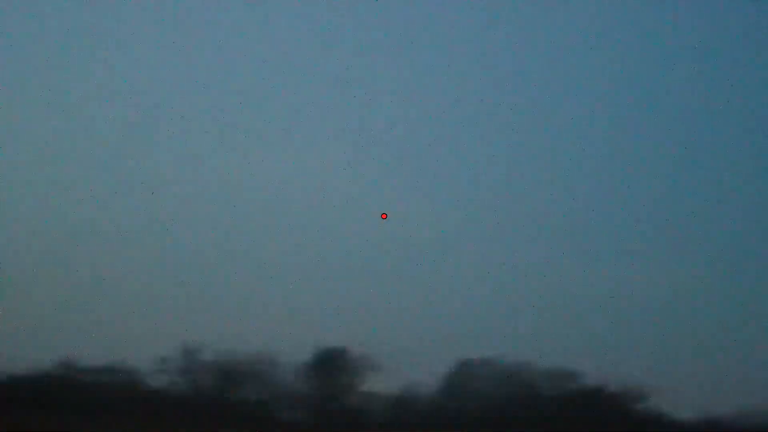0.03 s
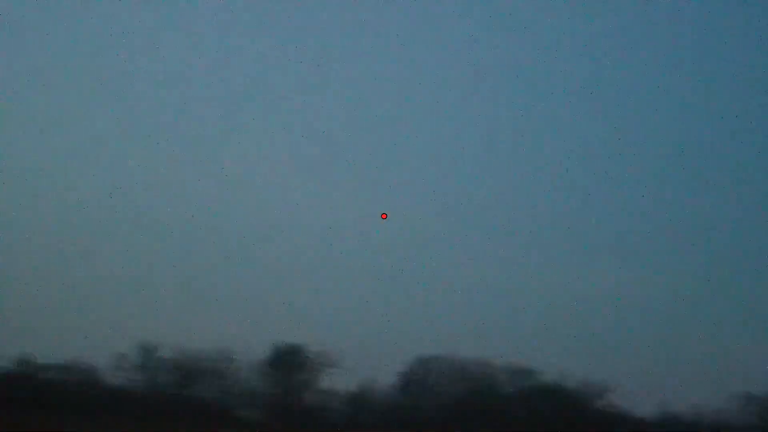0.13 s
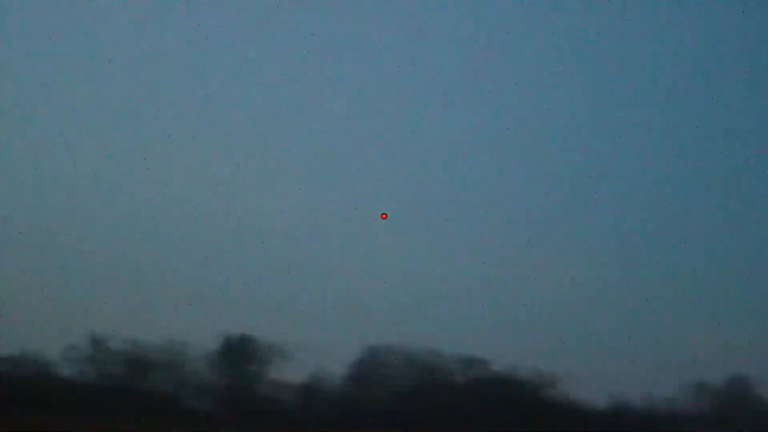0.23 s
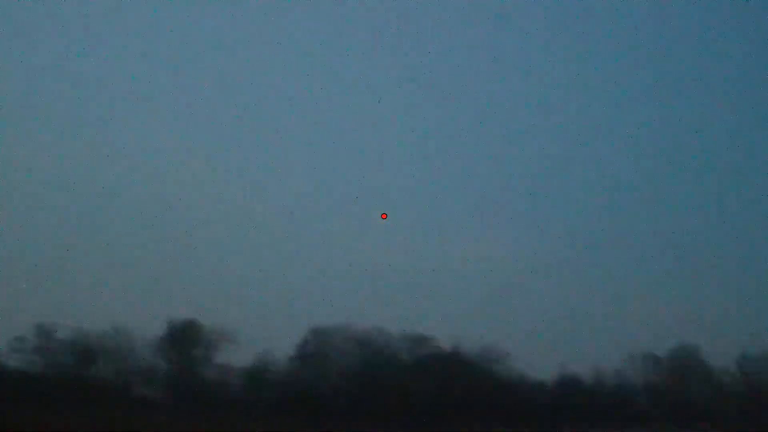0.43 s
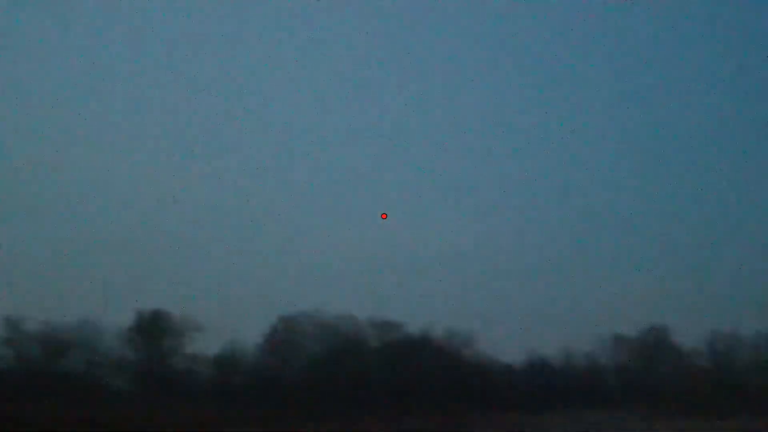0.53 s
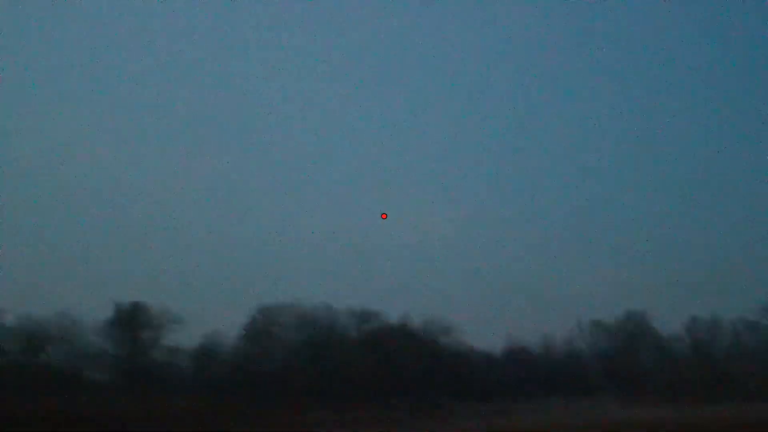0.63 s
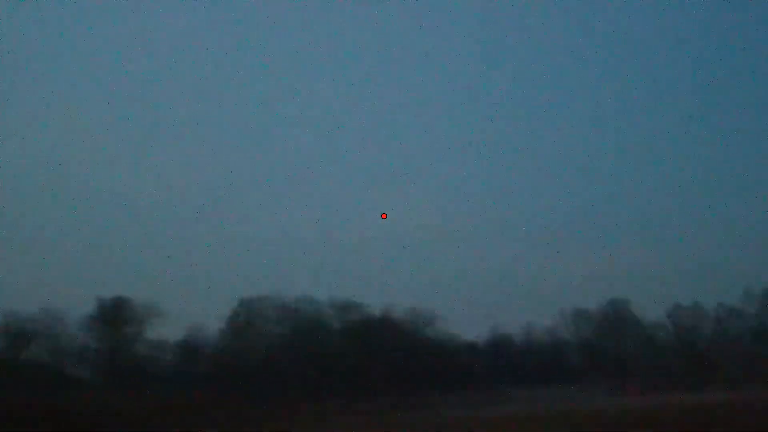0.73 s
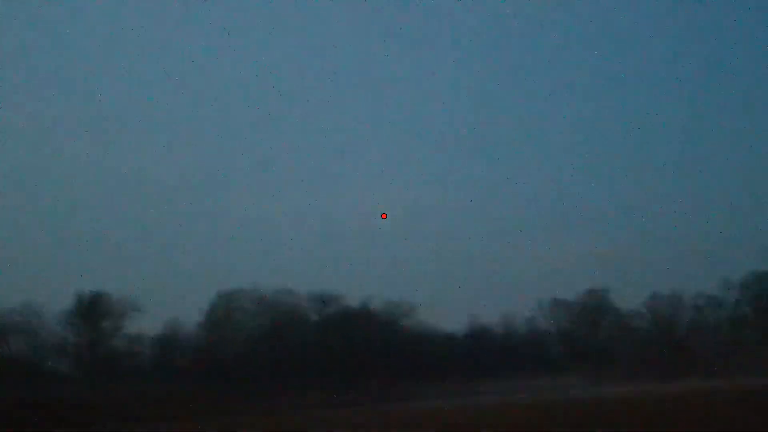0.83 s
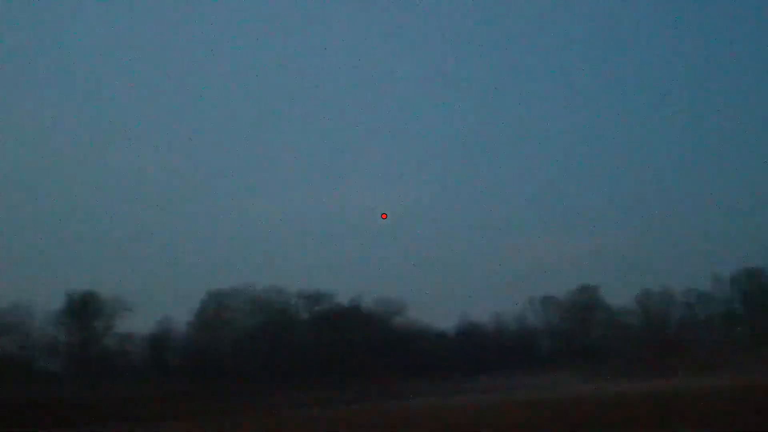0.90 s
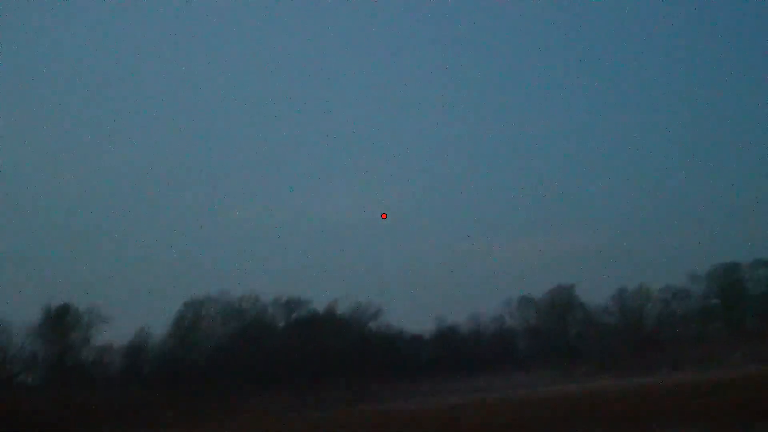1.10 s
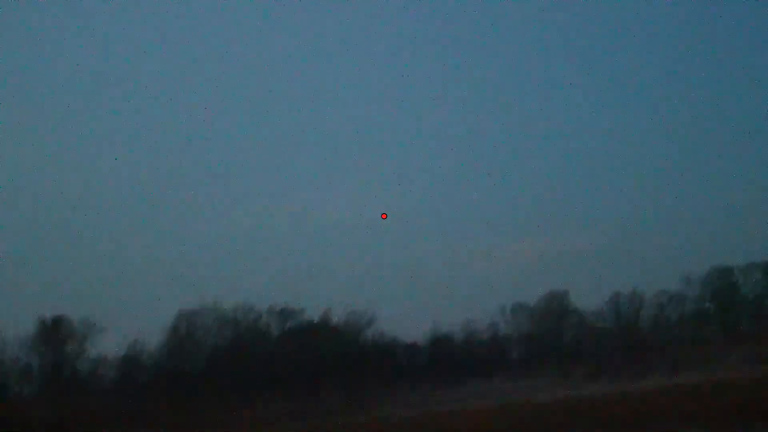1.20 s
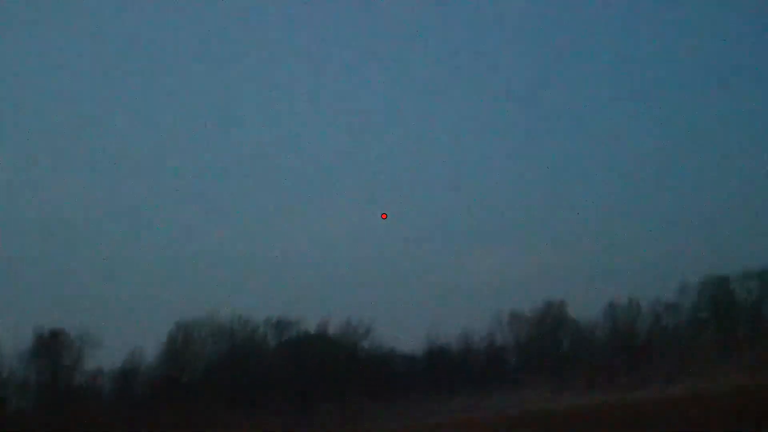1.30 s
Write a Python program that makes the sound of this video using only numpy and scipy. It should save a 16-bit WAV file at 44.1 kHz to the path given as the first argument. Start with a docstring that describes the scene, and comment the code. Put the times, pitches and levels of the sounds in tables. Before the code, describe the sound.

One very close gunshot heard through a small camera housing, preceded by a short clack of the gun's action; the distorted bang breaks into quick echoes and a boxy, humming rumble fading into faint wind and hiss.

```python
"""Open country, with one gunshot heard on a small camera that probably rides on the gun.
A clack of the action (decaying sines and a noise tick) rings the housing, over faint hiss and wind.
The blast, a pressure swing with a noisy crack, overloads the microphone for about 20 ms.
Tree lines send back sharp slaps of noise, low booms and a long rolling echo of ever duller noise;
the housing colours the echo and hums along as a wavering low tone."""
import sys
import numpy as np
from scipy import signal
from scipy.fft import irfft
from scipy.io import wavfile

SR = 44100
rng = np.random.default_rng(int(sys.argv[2]) if len(sys.argv) > 2 else 0)


def transcribe(u):
    """Save the signal u as a 16-bit wav file named by the first command-line argument.

    u: samples, shape (n,) or (channels, n), limited to [-1, 1]; the rate is SR.
    q: integer samples, one column per channel.
    """
    v = np.clip(np.atleast_2d(u).T, -1, 1)
    q = np.round(v * 32767).astype(np.int16)
    wavfile.write(sys.argv[1], SR, q)


N = 59535

SHOT_S = 0.2285


def undb(db):
    """Decibels to gain."""
    return 10 ** (np.asarray(db) / 20)


def unit(x):
    """Scale to rms 1."""
    return x / np.sqrt(np.mean(x ** 2))


def since(start_s):
    """Seconds since a moment, zero before it."""
    return np.maximum(np.arange(N) / SR - start_s, 0)


def burst(start_s, rise_s, decay_s):
    """A quick rise and an exponential fall."""
    age = since(start_s)
    rise = 1 - np.exp(-(age / rise_s) ** 2)
    return rise * np.exp(-age / decay_s)


def bump(at_s, width_s):
    """One rounded push of pressure, falling to 1/e at width_s either side."""
    return np.exp(-((np.arange(N) / SR - at_s) / width_s) ** 2)


def curve(points):
    """Gain over time from (s, dB) points, opening with the shot."""
    time_s, level_db = np.array(points).T
    gain = undb(np.interp(np.arange(N) / SR, time_s, level_db))
    return gain * np.minimum(since(SHOT_S) / 0.0019, 1)


def noise(points):
    """Noise of rms 1 with random phases and a spectrum drawn through (Hz, dB) points."""
    octave = np.log2(np.maximum(np.arange(N // 2 + 1) * SR / N, 1))
    hz, db = np.array(points).T
    gain = undb(np.interp(octave, np.log2(hz), db))
    phase = 2 * np.pi * rng.random(len(gain))
    return unit(irfft(gain * np.exp(1j * phase), N))


def band(x, lo_hz, hi_hz):
    """Gentle band-pass."""
    sos = signal.butter(2, [lo_hz, min(hi_hz, SR / 2 - 1)], "band", fs=SR, output="sos")
    return signal.sosfilt(sos, x)


def background():
    """Faint hollow hiss and a little wind on the microphone: shaped noise and very low noise."""
    # spectrum of the steady hiss: pitch_hz, relative level_db (per Hz)
    hiss_spectrum = [(8, -2.5), (20, -8.5), (50, -13.5), (200, -11), (290, -26), (420, -23), (560, -17.5),
                     (680, -13), (820, -30.5), (1700, -41), (7000, -36.5)]
    hiss_db, wind_db = -47.5, -48.5
    hiss = undb(hiss_db) * noise(hiss_spectrum)
    wind = undb(wind_db) * unit(band(rng.standard_normal(N), 4.5, 25))
    return hiss + wind


def clack():
    """A tick of metal and the short modal ring of gun and housing, just before the shot."""
    # ringing modes of gun and housing: pitch_hz, relative level_db, t60_s (time to fall 60 dB)
    modes = [(197, -17, .11), (537.3, 0.5, 0.04), (592.6, -2, 0.044), (1036, -5.5, 0.014),
             (1285, -14, 0.02), (1585, -26.5, .032), (2075, -45, 0.083), (2300, -37.5, 0.036)]
    # spectrum of the metal tick: pitch_hz, relative level_db (per Hz)
    tick_spectrum = [(300, -37), (520, -9.5), (850, -5.5), (1200, 8.5), (1450, -9.5), (2000, -17.5),
                     (2600, -26), (3100, -12.5), (3700, -37), (7000, -41)]
    clack_s, rise_cycles = 0.135, 2.56
    ring_db, tick_db = -3, -24
    ring = 0
    for hz, db, t60_s in modes:
        envelope = burst(clack_s, rise_cycles / hz, t60_s / np.log(1000))
        ring = ring + undb(db) * envelope * np.sin(2 * np.pi * hz * since(clack_s))
    tick = noise(tick_spectrum) * burst(clack_s, 0.0012, 0.0058)
    return undb(ring_db) * ring + undb(tick_db) * tick


def blast():
    """A noisy crack on a huge, brief pressure swing that ends in a deep trough and settles."""
    # spectrum of the crack: pitch_hz, relative level_db (per Hz)
    crack_spectrum = [(100, -6.5), (200, 2.5), (330, -22.5), (600, -1.5), (820, -7.5), (1200, 1),
                      (2200, -11.5), (4000, -23.5), (7000, -22.5)]
    rise_s = 0.0015
    swing_hz, swing_db, swing_hold_s, swing_decay_s = 112, 8, 0.01232, 0.003
    suction_bias = 0.18
    trough_s, trough_width_s, trough_db = 0.2455, 0.0018, 20
    age = since(SHOT_S)
    opening = np.minimum(age / rise_s, 1)
    fading = np.exp(-since(SHOT_S + swing_hold_s) / swing_decay_s)
    swing = np.sin(2 * np.pi * swing_hz * age) - suction_bias
    swing = undb(swing_db) * opening * fading * swing
    # low pressure behind the front, then the slow return to rest
    trough = undb(trough_db) * bump(trough_s, trough_width_s)
    recovery = burst(trough_s, 0.002, 0.0098)
    crack = noise(crack_spectrum) * burst(SHOT_S, rise_s, 0.0092)
    return swing - trough + recovery + crack


def roll():
    """Scatter from ground and trees, ever duller, over a rumble that lasts longer."""
    # spectrum of the echoes as the housing passes them: pitch_hz, relative level_db (per Hz)
    echo_spectrum = [(100, -30), (240, -0.5), (305, -18.5), (370, -3.5), (470, 0), (660, -2), (820, -14.5),
                     (1080, -24), (1280, -14), (1470, -36), (2000, -28), (2400, -46.5), (2950, -31),
                     (3450, -43.5), (3850, -32.5), (4300, -48), (6200, -36), (6900, -37)]
    # spectrum of the rumble: pitch_hz, relative level_db (per Hz)
    rumble_spectrum = [(8, -32.5), (25, -7), (70, 10.5), (120, -8), (170, -2.5), (300, -6.5), (800, -62)]
    # strength of the rolling echo: time_s, level_db
    strength = [(0.237, -5), (0.261, -16), (0.296, -18), (0.324, -22.5), (.355, -21), (.41, -29.5),
                (.47, -30.5), (.53, -32), (.575, -36.5), (.635, -34.5), (.69, -39.5), (.83, -43),
                (.89, -40), (.98, -47.5), (1.09, -43), (1.16, -51.5), (1.35, -54.5)]
    air_db_per_s_khz = 6  # longer paths lose more treble
    rumble_db, rumble_db_per_s = -12.5, 7  # on top of the strength curve
    hz, s, cells = signal.stft(noise(echo_spectrum), SR, nperseg=1024)
    loss_db = air_db_per_s_khz * np.outer(hz / 1000, np.maximum(s - SHOT_S, 0))
    scatter = signal.istft(cells * undb(-loss_db), SR)[1][:N]
    rumble = noise(rumble_spectrum) * undb(rumble_db + rumble_db_per_s * since(SHOT_S))
    return curve(strength) * (scatter + rumble)


def hum():
    """The echoes keep the lowest mode of the housing ringing: a sine with a wavering pitch."""
    # level of the housing's hum: time_s, level_db (rms)
    strength = [(.24, 1), (.273, -22.5), (.297, -12), (.328, -40), (.363, -19), (.40, -22.5), (.47, -33),
                (.52, -32.5), (.553, -46.5), (.59, -30.5), (.665, -37), (.735, -52), (.77, -34.5),
                (.83, -46), (.9, -38.5), (1, -51), (1.035, -42.5), (1.135, -62), (1.175, -51), (1.35, -58)]
    housing_hz, wander_rms_hz = 199, 13.2
    wander = unit(band(rng.standard_normal(N), 4.5, 40))
    phase = 2 * np.pi * np.cumsum(housing_hz + wander_rms_hz * wander) / SR
    return curve(strength) * np.sqrt(2) * np.sin(phase)


def slaps():
    """Short, brighter returns of the crack from single trees and edges: bursts of noise."""
    # sharp echoes: start_s, level_db
    returns = [(0.261, -13.5), (0.287, -13.5), (0.338, -19), (0.355, -18.5), (0.459, -30), (0.48, -22.5),
               (0.502, -29.5), (0.523, -27.5), (.534, -42), (0.552, -30.5), (0.607, -36), (0.86, -38.5),
               (0.892, -37), (0.923, -34), (1.028, -38)]
    # spectrum of the sharp echoes: pitch_hz, relative level_db (per Hz)
    slap_spectrum = [(150, -13.5), (300, -18), (450, 8.5), (680, 7), (850, -16.5), (1280, -3.5),
                     (1500, -28), (2100, -23), (2500, -40.5), (3900, -36), (7000, -50)]
    envelope = sum(undb(db) * burst(s, 0.0004, 0.0062) for s, db in returns)
    return noise(slap_spectrum) * envelope


def booms():
    """Rounded returns of the pressure wave from the tree lines: band-passed dips of pressure."""
    # low echoes: peak_s, peak level_db ahead of the band-pass
    returns = [(0.288, -11), (0.368, -10.5), (.392, -25.5), (0.414, -11.5), (0.451, -20), (0.583, -22),
               (0.657, -30), (.770, -33.5), (0.799, -34.5), (0.82, -29), (1.037, -35.5), (1.094, -35)]
    pressure = -sum(undb(db) * bump(s, 0.0019) for s, db in returns)
    return band(pressure, 26, 900)


def scene():
    """Clack, shot and echoes over the quiet field."""
    shot = blast() + roll() + hum() + slaps() + booms()
    return (background() + clack() + shot)[None]


def record(dry):
    """The input saturates with rounded edges, the top is cut, and the overshoot clips at full scale."""
    ceiling, knee = 1.008, 44  # a high knee makes the saturation hard
    rounding_hz, top_hz = 3860, 7200
    flat = dry / (1 + np.abs(dry / ceiling) ** knee) ** (1 / knee)
    rounding = signal.bessel(2, rounding_hz, fs=SR, norm="mag", output="sos")
    rounded = signal.sosfilt(rounding, flat)
    top_cut = signal.ellip(8, 0.05, 50, top_hz, fs=SR, output="sos")
    narrow = signal.sosfiltfilt(top_cut, rounded)
    clipped = np.clip(narrow, -1, 1)
    # a last low-pass above the clipping
    return signal.sosfilt(signal.ellip(8, 0.1, 70, 15800, fs=SR, output="sos"), clipped)


dry = scene()
out = record(dry)
transcribe(out)
```